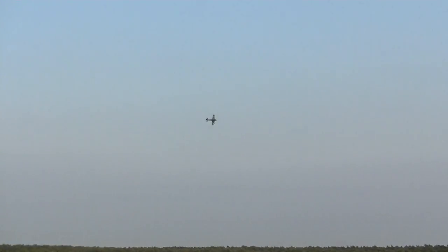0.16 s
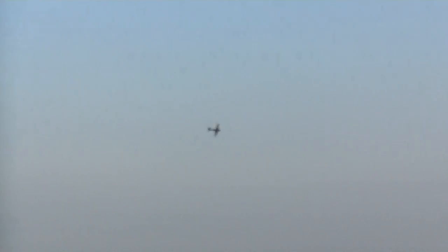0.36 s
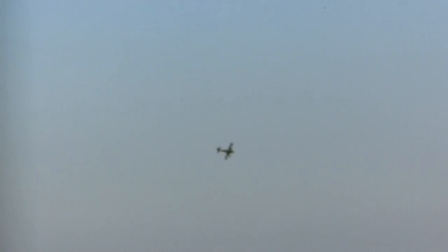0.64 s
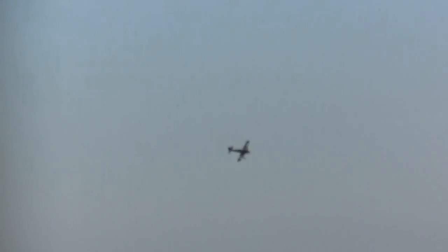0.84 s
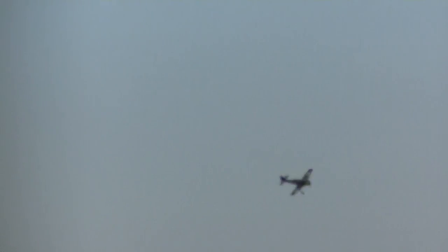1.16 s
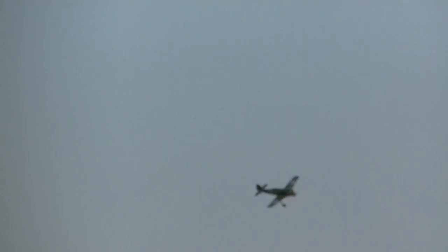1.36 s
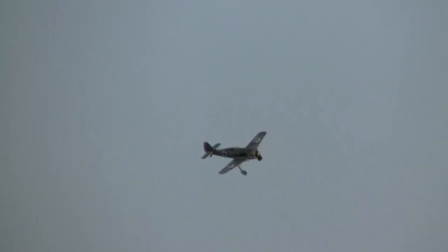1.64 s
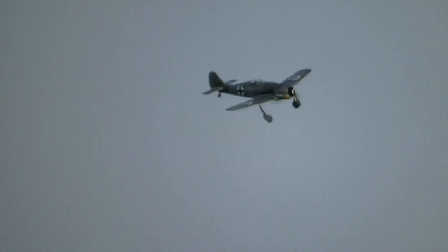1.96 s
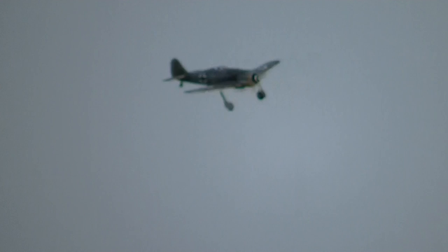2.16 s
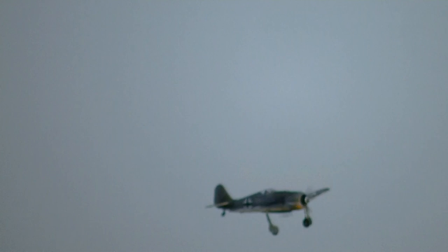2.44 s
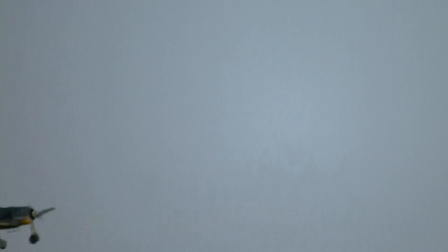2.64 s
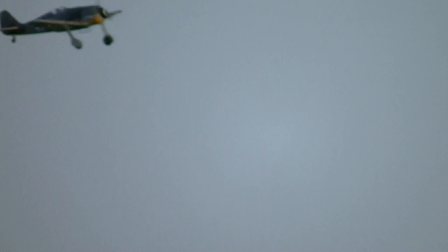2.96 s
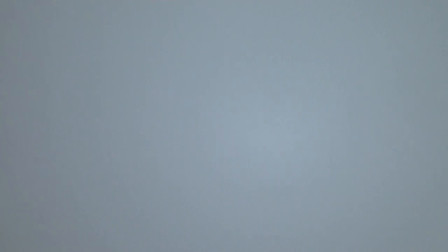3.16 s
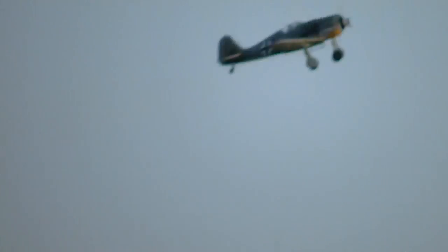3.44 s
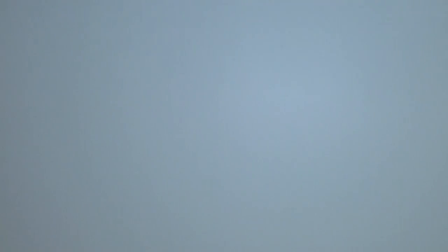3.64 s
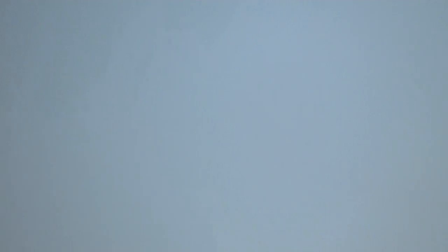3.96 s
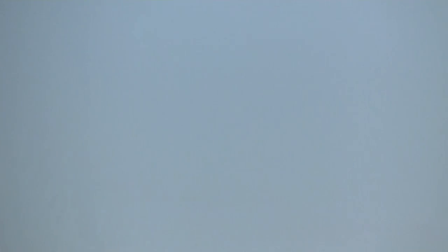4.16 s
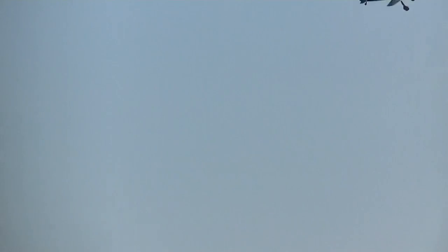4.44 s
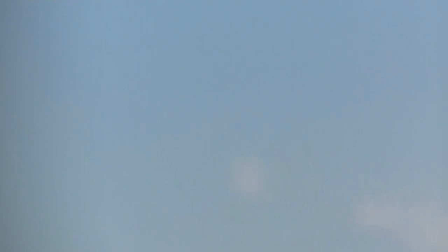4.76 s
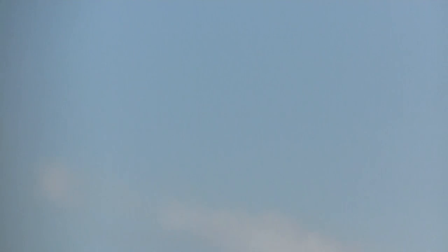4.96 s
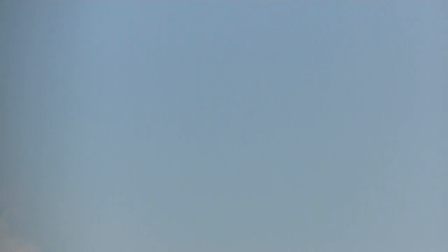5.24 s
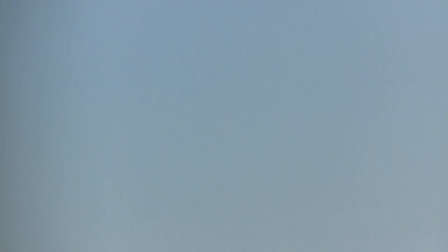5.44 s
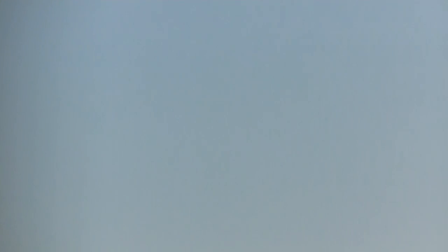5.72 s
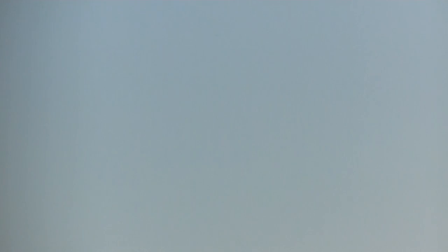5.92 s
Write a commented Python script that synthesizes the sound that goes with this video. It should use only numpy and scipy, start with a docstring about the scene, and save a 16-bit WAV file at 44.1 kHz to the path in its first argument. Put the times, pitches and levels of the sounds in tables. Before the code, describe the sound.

A small electric model airplane is heard throughout, flying over an open field: a fairly quiet, high whine of several pulsing tones, with an airy propeller swish, a thin whistle on top and a faint low hum. The whine strengthens at about 1.3 seconds. Its pitch rises slightly until 2 seconds, then slowly sinks after 3. The swish surges irregularly, and the plane is strongest around 5.4 seconds. Two sharp plastic clicks close to the hand-held microphone are the loudest sounds, at about 1.95 and 4.5 seconds, the second with a tiny rattle. A finger briefly rubs the casing at 2.9 seconds. A softer click comes at 3.55 with short, low wind thuds, and lighter puffs follow around 4.3 and 5.7. Faint breathy air whistles sound at about 5.2 and 5.9 seconds. A soft wash of open air lies underneath.

```python
"""A motor's whine over a propeller's swish: a small electric model plane crosses a field and climbs away.
Magnets passing the stator make the whine; the blades hum and tear the air; the speed controller whistles.
The ground echo's changing lag makes the tones pulse and sweeps a comb through the swish.
Over a faint wash of open air, wind puffs at the two microphone ports of a hand-held camera,
whose plastic shell clicks and is rubbed by a finger. Near the end the rushing air whistles twice."""
import sys
import numpy as np
from scipy import signal
from scipy.fft import rfft, irfft
from scipy.io import wavfile
from scipy.ndimage import uniform_filter1d, map_coordinates

SR = 44100
rng = np.random.default_rng(int(sys.argv[2]) if len(sys.argv) > 2 else 0)


def generate_wav(sig):
    """Save sig (samples, or channels by samples) to the path in sys.argv[1] as 16-bit PCM at SR."""
    pcm = np.round(np.clip(np.atleast_2d(sig).T, -1, 1) * 32767).astype(np.int16)
    wavfile.write(sys.argv[1], SR, pcm)


N = 268466
TIME = np.arange(N) / SR


def amp(db):
    """Decibels to gain."""
    return 10 ** (np.asarray(db) / 20)


def unit_rms(x):
    """Scales to rms 1."""
    return x / np.sqrt(np.mean(x ** 2) + 1e-20)


def curves(rows, t=TIME):
    """Each column after the first, interpolated over time."""
    times_s, *columns = np.transpose(rows)
    return [np.interp(t, times_s, column) for column in columns]


def colour(x, spectrum):
    """Filters x by (Hz, dB) points, interpolated over log frequency."""
    size = x.shape[-1]
    points_hz, points_db = np.transpose(spectrum)
    hz = np.fft.rfftfreq(size, 1 / SR)
    gain_db = np.interp(np.log(hz + 1), np.log(points_hz), points_db)
    return irfft(rfft(x) * amp(gain_db), size)


def wander(rate_hz):
    """Slow random drift, rms 1."""
    hz = np.fft.rfftfreq(N, 1 / SR)
    return unit_rms(irfft(rfft(rng.standard_normal(N)) / (1 + (hz / rate_hz) ** 4), N))


def bump(t, peak_s, length_s):
    """One smooth rise and fall, height 1."""
    return np.cos(np.pi * np.clip((t - peak_s) / length_s, -.5, .5)) ** 2


def delayed(x, lag_ms):
    """Delays x by a steady or moving lag."""
    return map_coordinates(x, [(TIME - lag_ms / 1000) * SR], order=3)


def panned(x, balance_db):
    """Stereo; positive balance leans left."""
    return x * amp([[balance_db / 2], [-balance_db / 2]])


def add(mix, start_s, sound):
    """Adds a stereo sound to the mix."""
    part = mix[:, max(round(start_s * SR), 0):][:, :sound.shape[1]]
    part += sound[:, :part.shape[1]]


# Each row: time in seconds, shaft speed and switching tone as heard in Hz, ground echo lag in ms.
FLIGHT = [(0.0, 134.29, 7668, 1.569), (0.6, 136.18, 7754, 1.509), (1.25, 138.93, 7864, 1.46),
          (1.5, 139.78, 7903, 1.418), (2.1, 141.26, 7965, 1.355), (2.4, 141.1, 7962, 1.323),
          (3.1, 141.1, 7943, 1.482), (3.5, 140.06, 7887, 1.654), (3.75, 139.25, 7855, 1.834),
          (4.0, 138.29, 7837, 2.059), (4.25, 138.1, 7826, 2.296), (4.55, 137.44, 7804, 2.439),
          (4.8, 136.94, 7802, 2.623), (5.2, 137.11, 7784, 2.699), (5.4, 137.46, 7789, 2.728),
          (5.6, 137.12, 7776, 2.756), (5.8, 136.8, 7756, 2.71), (6.09, 134.4, 7712, 2.586)]
SHAFT_HZ, SWITCHING_HZ, GROUND_LAG_MS = curves(FLIGHT)


def shaft_angle(jitter=0.00067):
    """Shaft angle in radians; gusts on the propeller shake its speed a little."""
    return 2 * np.pi * np.cumsum(SHAFT_HZ * (1 + jitter * wander(34))) / SR


def echoed_tone(phase, levels, reflection):
    """A tone plus its ground echo; it pulses as the changing lag turns them in and out of step."""
    hz = np.gradient(phase) * SR / (2 * np.pi)
    lag_rad = 2 * np.pi * hz * GROUND_LAG_MS / 1000
    phase = phase + 2 * np.pi * rng.random()
    return np.sqrt(2) * amp(curves(levels)[0]) * (np.sin(phase) + reflection * np.sin(phase - lag_rad))


def flutter(depth_db, port_db):
    """Gain at the two ports after a path through moving air."""
    return amp(depth_db * wander(20) + port_db * wander(4.8) * np.array([[1], [-1]]))


# Keyed by order (multiple of shaft speed). Each row: time in seconds, direct level in dB.
WHINE_LEVELS = {13: [(0, -60), (.9, -66), (1.35, -53), (2.7, -85), (4.3, -53), (4.9, -50), (5.35, -45.5),
                (5.7, -51.5), (6.09, -60)], 14: [(0, -88), (.65, -52), (.9, -61), (1.35, -54), (2.3, -53),
                (3.4, -67.5), (4.65, -56), (5.38, -47.5), (5.7, -55), (6.09, -58)], 21: [(0, -49),
                (.55, -60.5), (.85, -70.5), (3.1, -85), (3.7, -67.5), (5.3, -64), (6.09, -85)],
                28: [(0, -76), (.3, -64.5), (.7, -74.5), (1.3, -52.5), (2.2, -65), (3.3, -58.5),
                (3.75, -50.5), (4.3, -52), (5.1, -59.5), (5.6, -52), (6.09, -63.5)], 42: [(0, -61),
                (.3, -53), (.6, -59.5), (1.3, -62.5), (1.33, -49.5), (1.85, -55), (2.85, -57.5), (3.4, -59),
                (4, -56), (4.23, -65), (4.5, -57), (5.15, -61), (5.4, -53.5), (5.7, -68), (6.09, -56.5)]}
# Ground echo gain per order, 0 to 1.
WHINE_REFLECTION = {13: .8, 14: .75, 21: .75, 28: .8, 42: .5}


def whine(angle, flutter_db=1.23, port_db=0.7):
    """Fourteen magnets pass the stator teeth; each tone is directional and swells as the plane turns."""
    return sum(echoed_tone(order * angle, levels, WHINE_REFLECTION[order]) * flutter(flutter_db, port_db)
               for order, levels in WHINE_LEVELS.items())


# Each row: peak time in seconds, length in seconds, swish boost in dB, extra hiss in dB.
FLARES = [(.075, 0.17, 7, 2.5), (.3, 0.29, 0, 3.5), (0.64, 0.29, 5, -4), (2.302, 0.37, 1, 5),
          (2.45, .14, 4, 2.5), (2.76, 0.22, 1.5, 3), (3.097, .3, 0, 6), (3.7, 0.21, -1, 5),
          (4.943, 0.12, 4.5, 1.5), (5.263, 0.21, 6.5, -2.5), (5.408, 0.2, 4.5, -2.5),
          (6.004, 0.12, 5, -0.5)]


def flares(t):
    """The propeller meets rough air: dB added to the swish and to its hiss."""
    return sum(np.outer([db, hiss_db], bump(t, peak_s, length_s))
               for peak_s, length_s, db, hiss_db in FLARES)


# Each row: frequency in Hz, relative density in dB.
SWISH_SPECTRUM = [(120, -34.5), (200, -23), (407, -18.5), (446, -15.5), (677, -10), (1300, -8.5),
                  (1840, -8.5), (2090, -7), (3610, -12.5), (3890, -6.5), (5390, -8), (5910, -11),
                  (6240, -12), (8050, -15.5), (15500, -29)]
# Each row: time in seconds, relative levels of swish and low roar in dB.
AIR_LEVELS = [(0, -49.5, -41.5), (1.1, -49, -43.5), (1.35, -46.5, -43.5), (2.15, -45, -39.5),
              (2.6, -47, -44.5), (3.6, -45, -41.5), (4.5, -43.5, -40.5), (6.09, -44, -40.5)]


def swish(angle, level_db=-9.0, patchy_db=1.5, flicker_db=1.3, chop=0.1,
          roar_hz=1700, roar_flare_share=0.32, hiss_hz=7800, hiss_db=4):
    """Turbulence from the blades, in drifting patches, throbbing as each blade comes round."""
    noise = unit_rms(colour(rng.standard_normal(N), SWISH_SPECTRUM))
    hz, t, bins = signal.stft(noise, SR, nperseg=512, noverlap=384)
    swish_db, roar_db = curves(AIR_LEVELS, t)
    flare_db, flare_hiss_db = flares(t)
    low = 1 / (1 + (hz[:, None] / roar_hz) ** 6)
    high = 1 - 1 / (1 + (hz[:, None] / hiss_hz) ** 8)
    bands_db = (low * (roar_db + roar_flare_share * flare_db)
                + (1 - low) * (swish_db + flare_db)
                + high * (hiss_db + flare_hiss_db))
    patches = uniform_filter1d(rng.standard_normal(bins.shape), size=7, axis=0)
    patches = unit_rms(uniform_filter1d(patches, size=24, axis=1))
    gain = amp(level_db + bands_db + patchy_db * patches)
    air = signal.istft(bins * gain, SR, nperseg=512, noverlap=384)[1][:N]
    throb = 1 + chop * np.cos(2 * angle)
    return air * amp(flicker_db * wander(14.6)) * throb


# Each row: shaft order, level in dB relative to the swish column of AIR_LEVELS.
BUZZ_ORDERS = [(11, -24.5), (12, -19), (15, -27.5), (16, -23), (24, -31.5)]


def buzz(angle, flutter_db=1.0):
    """The motor's weak orders, swelling with the swish."""
    tones = sum(amp(db + flutter_db * wander(11.0)) * np.sin(order * angle + 2 * np.pi * rng.random())
                for order, db in BUZZ_ORDERS)
    return np.sqrt(2) * amp(curves(AIR_LEVELS)[0]) * tones


# Each row: frequency in Hz, reflection in dB.
GRASS_REFLECTION = [(200, -8), (1000, -6.5), (3000, -6), (8000, -10.5), (13000, -17)]


def with_echoes(x, far_gain=0.06):
    """Grass returns a duller copy, later as the plane climbs; a farther surface returns a faint one."""
    ground = colour(delayed(x, GROUND_LAG_MS), GRASS_REFLECTION)
    far_lag_ms = 6.9 + .16 * GROUND_LAG_MS
    return x + ground + far_gain * delayed(x, far_lag_ms)


# Keyed by shaft order. Each row: time in seconds, direct level in dB.
HUM_LEVELS = {2: [(0, -70.5), (1.9, -68), (2.6, -83), (4, -62.5), (6.09, -64.5)], 3: [(0, -62), (.7, -63.5),
              (3.1, -71.5), (4.7, -70), (5.35, -65.5), (6.09, -71)], 4: [(0, -66.5), (1.9, -79.5),
              (3.7, -62.5), (6.09, -81)], 5: [(0, -80), (1.2, -70.5), (2, -73), (4.8, -88), (5.35, -59),
              (6.09, -80)]}


def hum(angle, flutter_db=2.2, reflection=0.52):
    """Low, fluttering tones of the turning propeller."""
    return sum(echoed_tone(order * angle, levels, reflection) * amp(flutter_db * wander(4.0))
               for order, levels in HUM_LEVELS.items())


# Each row: time in seconds, direct level in dB.
SWITCHING_LEVELS = [(0, -77), (.65, -64), (.9, -74), (1.25, -75), (1.35, -60), (2.2, -81), (2.8, -63.5),
                    (3.9, -59.5), (5.8, -71), (6.04, -62)]


def speed_controller(reflection=0.68):
    """The chopped motor current whistles thinly; only the plane's motion bends its pitch."""
    phase = 2 * np.pi * np.cumsum(SWITCHING_HZ) / SR
    return echoed_tone(phase, SWITCHING_LEVELS, reflection)


# Each row: frequency in Hz, side relative to mid in dB.
STEREO_WIDTH = [(100, 7.5), (400, -1.5), (1200, -7.5), (2400, -7.5), (4400, -10.5), (8100, -8.5),
                (15000, -4)]


def plane(balance_db=-0.6):
    """Motor, propeller and rushing air; part of the swish differs between the ports."""
    angle = shaft_angle()
    mid = with_echoes(swish(angle) + buzz(angle)) + hum(angle) + speed_controller() + air_whistle()
    side = colour(swish(angle), STEREO_WIDTH)
    return panned(whine(angle) + np.array([mid + side, mid - side]), balance_db)


# Each row: frequency in Hz, relative density in dB.
FIELD_SPECTRUM = [(25, -12), (60, -15), (120, -11.5), (220, -1.5), (450, 2), (900, 6.5), (2000, -1),
                  (5000, -12), (10000, -33.5), (16000, -36)]


def field(level_db=-57):
    """Faint wash of open air, wide in the bass."""
    mid, side = colour(rng.standard_normal((2, N)), FIELD_SPECTRUM)
    side = colour(side, STEREO_WIDTH)
    return amp(level_db) * unit_rms(np.array([mid + side, mid - side]))


# Each row: peak time in seconds, length in seconds, level in dB, balance in dB.
PUFFS = [(0.243, 0.014, -58, -3), (1.02, 0.0089, -53, 3), (2.622, 0.019, -47, 2.5), (3.355, 0.05, -58, -9),
         (3.432, 0.24, -63, -7), (3.529, 0.015, -33.5, 2), (3.589, 0.017, -37, -3),
         (3.646, 0.074, -48, -4.5), (3.698, 0.034, -55.5, -4), (3.876, 0.025, -48, -5),
         (3.94, 0.28, -59, -1), (4.288, 0.048, -48, -2), (4.351, 0.024, -58, -15),
         (5.726, 0.069, -43.5, -1), (5.807, 0.022, -54, 8), (5.906, 0.063, -48, -6),
         (6.079, 0.038, -55.5, -1)]
# Each row: frequency in Hz, relative density in dB.
PUFF_SPECTRUM = [(30, -38), (80, -29), (150, -2.5), (250, -1), (400, -2), (550, -13.5), (900, -34),
                 (2500, -58)]


def wind(mid_gain=0.4):
    """Eddies push the two ports mostly in opposite directions, as short low thuds."""
    out = np.zeros((2, N))
    t = np.arange(SR // 4) / SR
    centre_s = t.mean()
    for peak_s, length_s, db, balance_db in PUFFS:
        eddy = rng.standard_normal((2, len(t))) * bump(t, centre_s, length_s)
        side, mid = colour(eddy, PUFF_SPECTRUM)
        ports = mid_gain * unit_rms(mid) + unit_rms(side) * np.array([[1], [-1]])
        puff = unit_rms(ports) * np.sqrt(length_s / t[-1])  # energy grows with length
        add(out, peak_s - centre_s, panned(amp(db) * puff, balance_db))
    return out


# Each row: mode frequency in Hz, bandwidth in Hz, relative level in dB.
SHELL_MODES = [(980, 133, -5.5), (1630, 780, -8.5), (2380, 325, 6.5), (2890, 270, 0.5), (3200, 123, -3),
               (4670, 670, -4), (6560, 400, -6.5), (7700, 610, -6.5), (9440, 730, -19), (9940, 230, -17),
               (13500, 3800, -20.5)]


def shell(push, treble_db=0., knock_db=0., lowest_hz=380):
    """A push rings the camera's shell; hard contacts favour the high modes, heavy ones the lowest."""
    t = np.arange(len(push)) / SR
    ring = np.zeros(len(t))
    for k, (hz, width_hz, db) in enumerate(SHELL_MODES):
        contact_db = treble_db * (hz > 4000) + knock_db * (k == 0)
        mode = width_hz * np.exp(-np.pi * width_hz * t) * np.sin(2 * np.pi * hz * t)
        ring += (-1) ** k * amp(db + contact_db) * mode
    highpass = signal.butter(2, lowest_hz, "high", fs=SR)  # so small a body radiates no bass
    return signal.lfilter(*highpass, signal.fftconvolve(push, ring)[:len(push)])


# Each row: start in seconds, relative strength, treble and low knock in dB, rattle T60 in seconds.
CLICKS = [(1.9494, -26, -2, 23, 0.0076), (1.9482, -19.5, -16, 9, 0.014), (1.95, -2, 11.5, 4, 0.019),
          (3.5603, -16.5, -0.5, 2, 0.036), (3.5649, -27.5, -3, 27, .018), (3.6068, -32.5, -7, 17, 0.018),
          (4.4593, -21.5, 4, 1, 0.051), (4.4745, -1, -6.5, -9.5, 0.014), (4.4768, -8, 10, 1, 0.019),
          (4.496, -20, -3, 4, 0.013), (4.499, -26, -7, 4, 0.016)]


def clicks(rattle_gain=0.14, port_lag_ms=0.02, level_db=11.0, balance_db=-2.5):
    """Plastic parts snap: a sharp blow and a dying rattle in the shell, reaching the left port first."""
    out = np.zeros((2, N))
    t = np.arange(SR // 10) / SR
    for start_s, db, treble_db, knock_db, t60_s in CLICKS:
        rattle = rattle_gain * rng.standard_normal(len(t)) * np.exp(-np.log(1000) * t / t60_s)
        snap = shell((t == 0) + rattle, treble_db, knock_db)
        snap /= np.linalg.norm(snap)
        add(out, start_s, panned(amp(db + level_db) * snap, balance_db))
    return np.array([out[0], delayed(out[1], port_lag_ms)])


# Each row: start in seconds, length in seconds, relative level in dB.
RUBS = [(2.906, 0.047, -47.5), (2.939, 0.064, -39.5)]


def rubs(band_hz=(900, 5200), balance_db=-6.5, level_db=-1.0):
    """A finger slides on the camera: friction noise, heard directly and through the shell."""
    out = np.zeros((2, N))
    skin = signal.butter(2, band_hz, "band", fs=SR)
    for start_s, length_s, db in RUBS:
        friction = rng.standard_normal(round(length_s * SR))
        direct = unit_rms(signal.lfilter(*skin, friction))
        rub = unit_rms(unit_rms(shell(friction)) + direct) * np.sqrt(np.hanning(len(friction)))
        add(out, start_s, panned(amp(db + level_db) * rub, balance_db))
    return out


# Each row: start in seconds, length in seconds, level at the crest in dB.
WHISTLES = [(5.127, 0.28, -50.5), (5.797, 0.34, -53.5)]


def air_whistle(centre_hz=3340, width_hz=130):
    """Rushing air whistles briefly in a narrow, breathy band as the plane climbs away."""
    hz = np.fft.rfftfreq(N, 1 / SR)
    resonance = 1 / (1 + (2 * (hz - centre_hz) / width_hz) ** 2)
    breath = unit_rms(irfft(rfft(rng.standard_normal(N)) * resonance, N))
    return breath * sum(amp(db) * np.sin(np.pi * np.clip((TIME - start_s) / length_s, 0, 1))
                        for start_s, length_s, db in WHISTLES)


def scene():
    """The plane over the field, with wind and handling at the camera."""
    return plane() + field() + wind() + clicks() + rubs()


def record(dry):
    """Clips at full scale and limits the band."""
    cutoff_hz = 15850
    lowpass = signal.firwin(511, cutoff_hz, window=("kaiser", 9), fs=SR)
    return signal.oaconvolve(np.clip(dry, -1, 1), lowpass[None], "same")


dry = scene()
out = record(dry)
generate_wav(out)
```